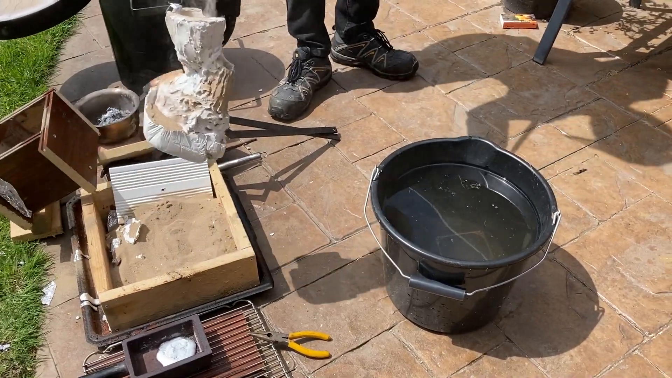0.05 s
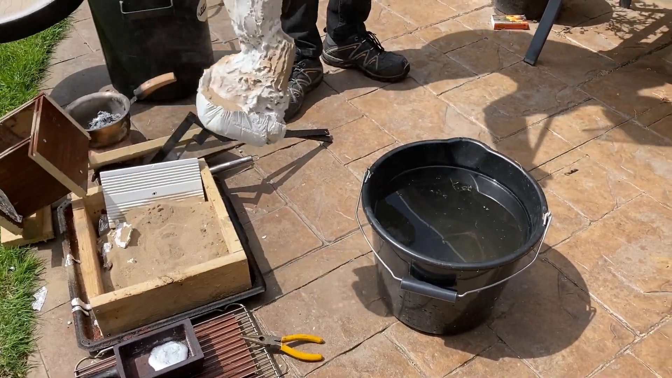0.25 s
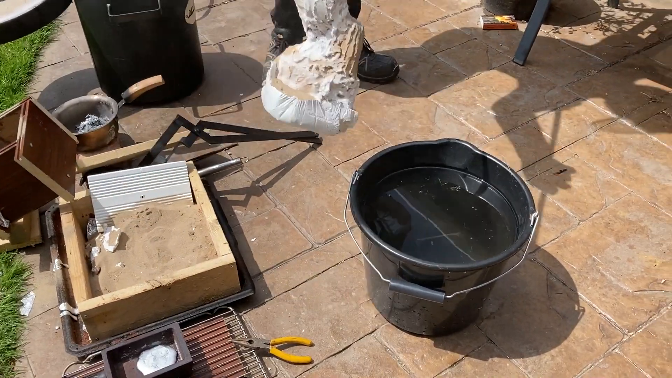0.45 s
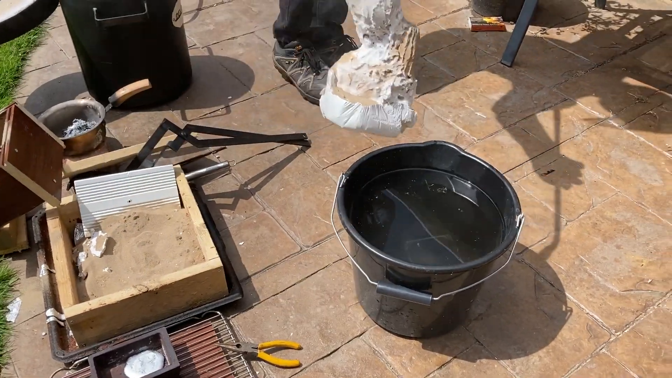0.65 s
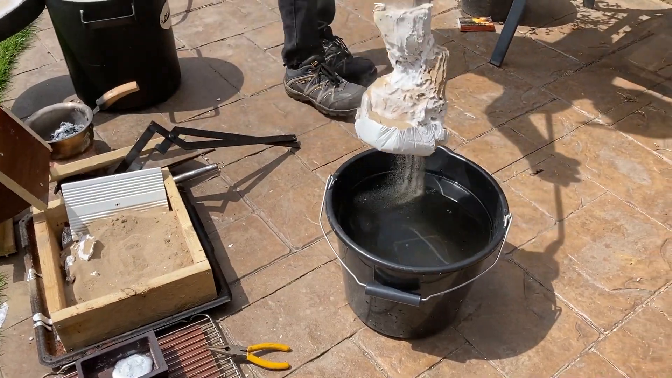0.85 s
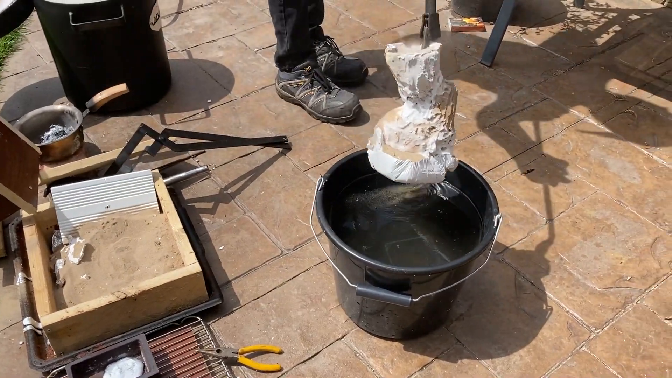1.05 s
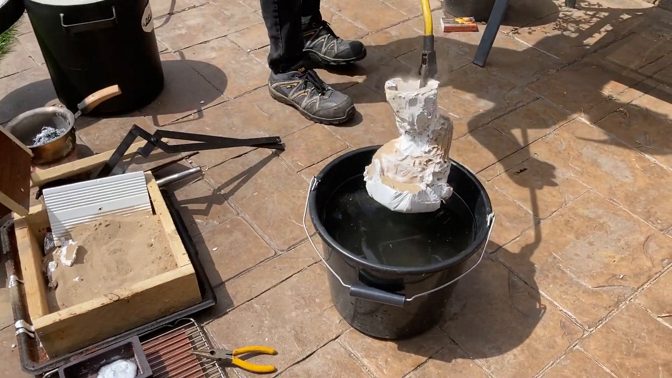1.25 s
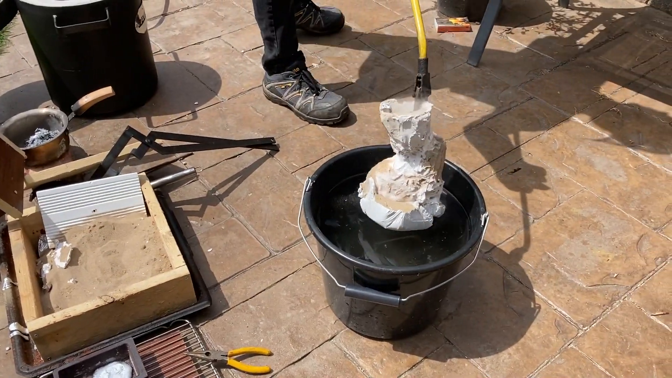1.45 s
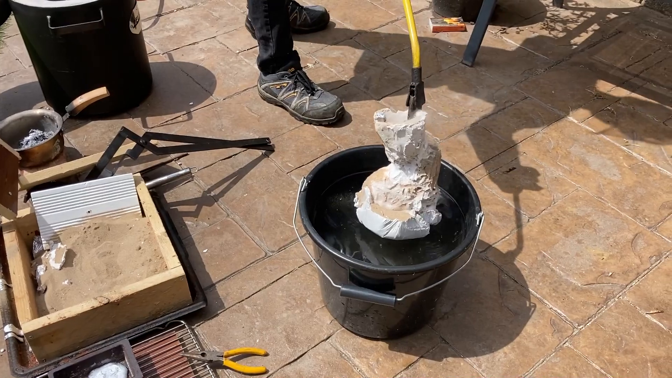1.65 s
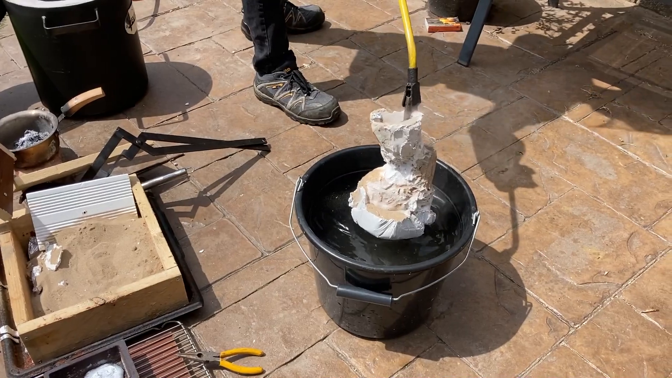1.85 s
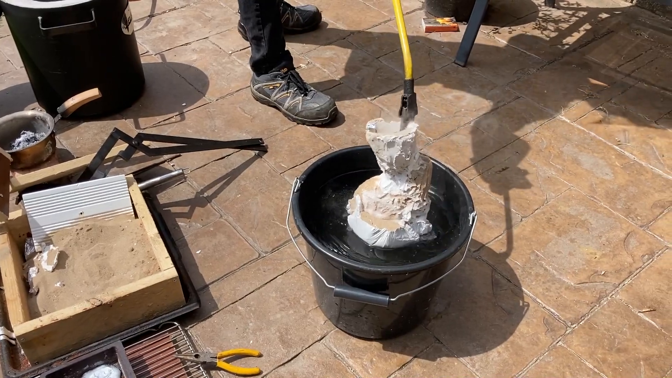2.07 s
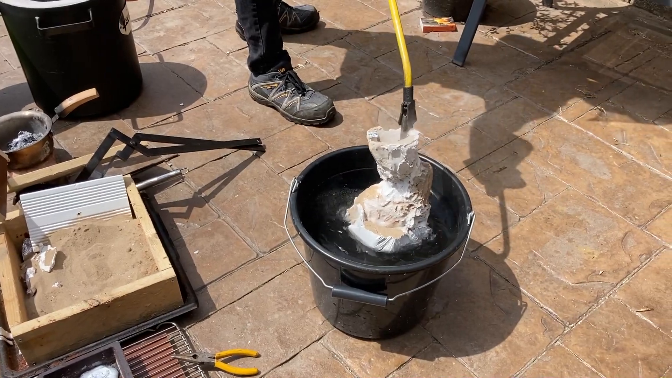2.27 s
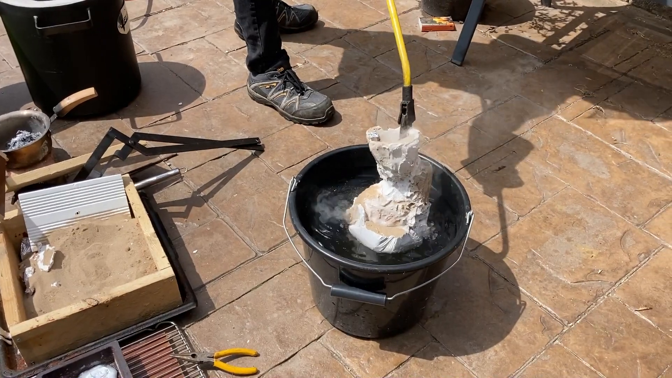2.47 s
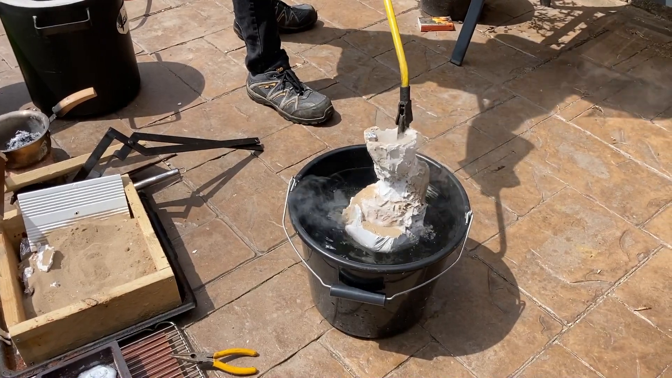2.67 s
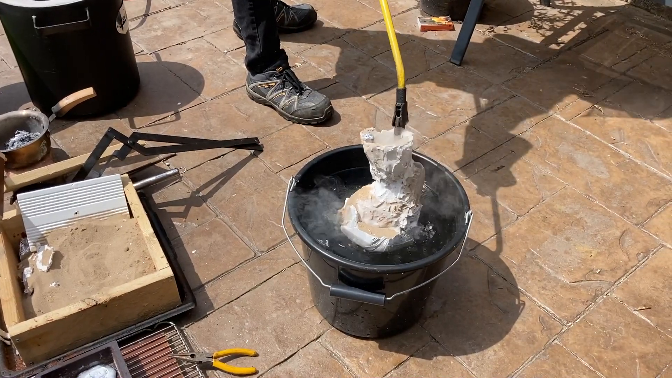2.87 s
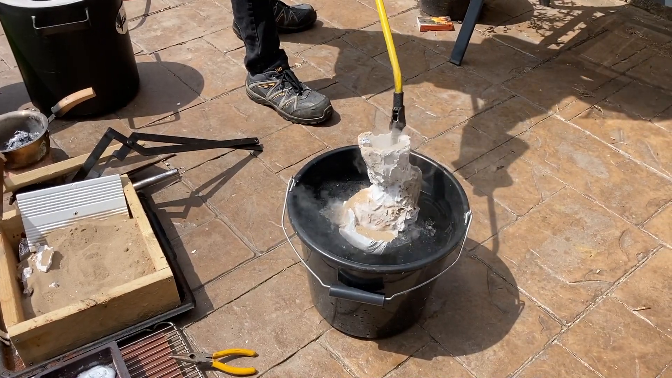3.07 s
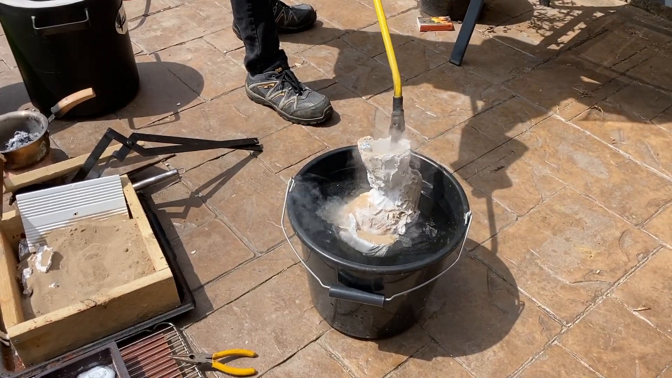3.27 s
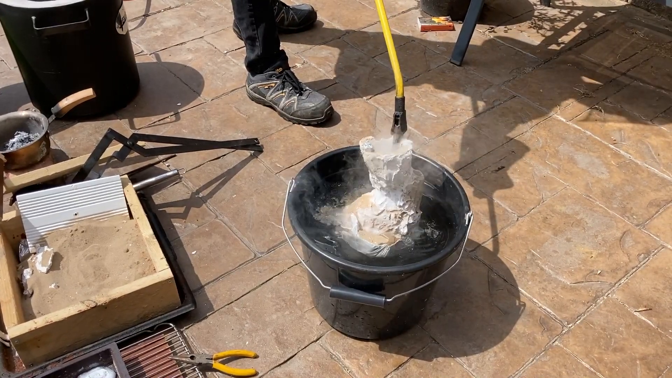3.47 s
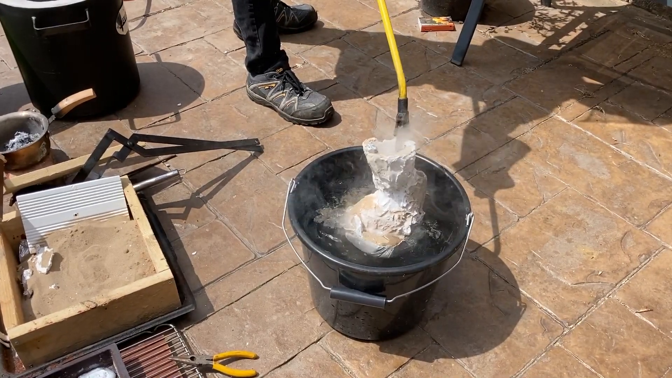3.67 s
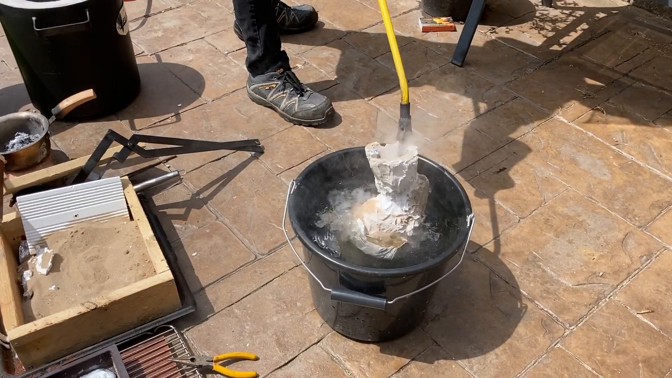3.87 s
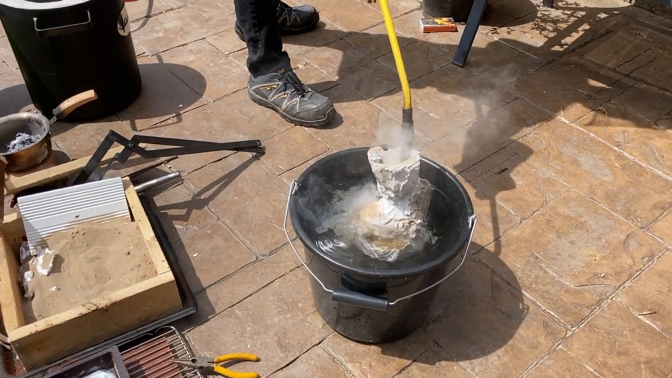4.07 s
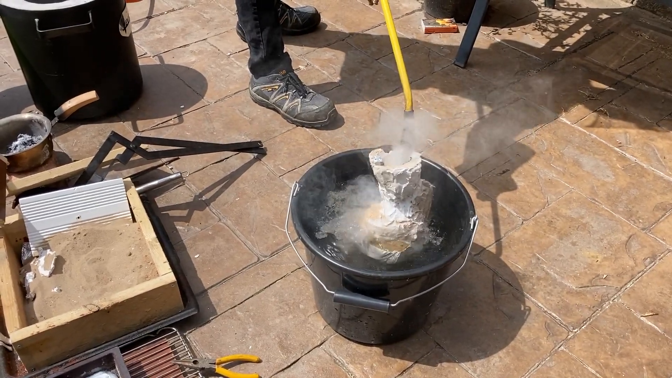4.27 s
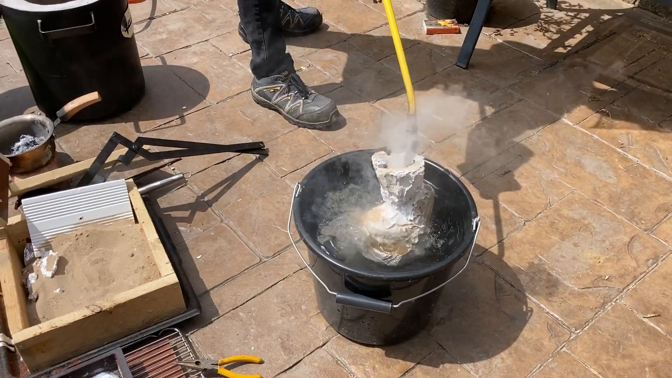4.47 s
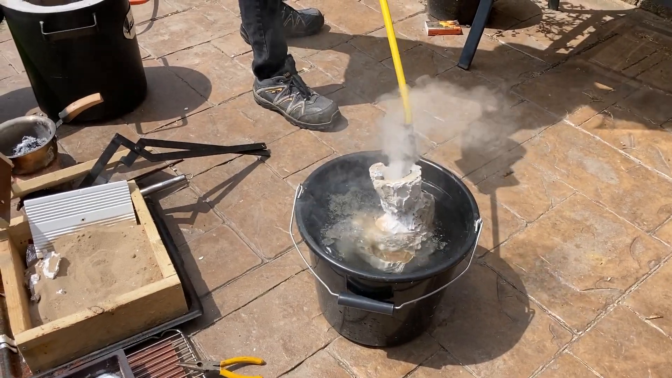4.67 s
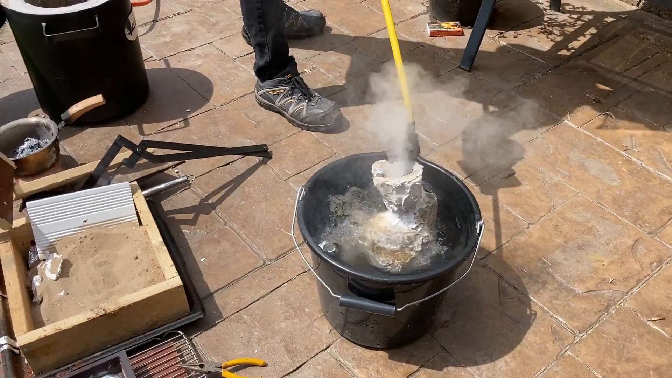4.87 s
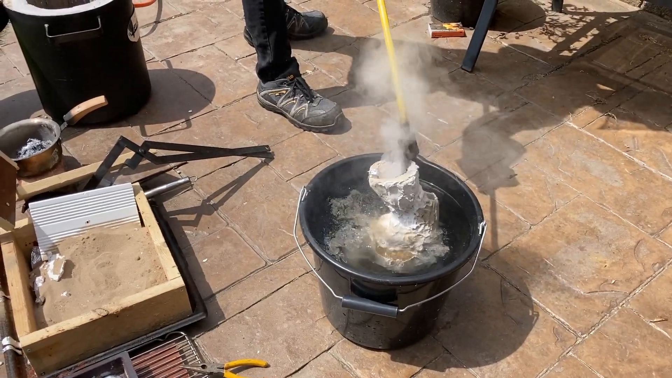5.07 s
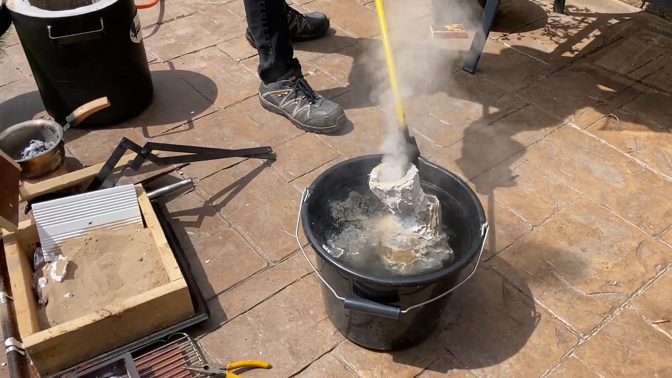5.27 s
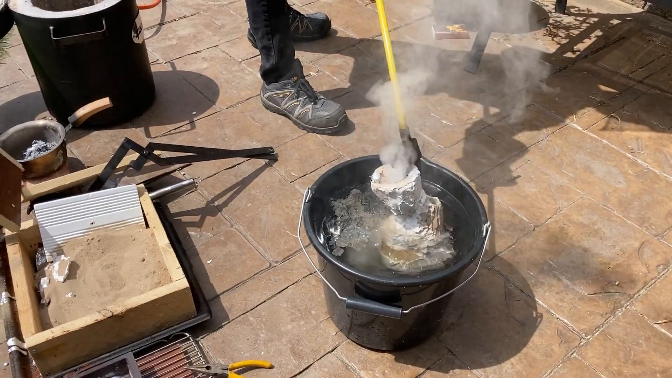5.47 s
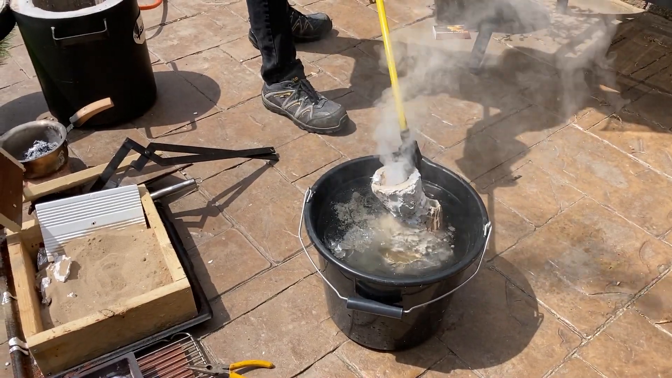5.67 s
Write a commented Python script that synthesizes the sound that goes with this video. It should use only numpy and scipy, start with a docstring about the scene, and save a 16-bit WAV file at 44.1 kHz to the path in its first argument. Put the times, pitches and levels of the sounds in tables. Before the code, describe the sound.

A quiet patio, heard close in stereo, with low far-off traffic and faint wavering engine drone throughout. A shoe scuffs grit briefly at 0.3 s; tiny plaster crumbs patter at about 0.75 and 1.15 s, with faint scuffs around 0.9, 1.2 and 1.4. At 1.45 s the hot mould touches water: a light fizz, small ringing bubbles and little spits. A sharp pop at 2.0 starts the violent boil, and from 2.2 to 2.8 bright hiss and crackle carry a dense cluster of hard, hollow snaps in the plastic bucket. Fresh surges follow near 2.9 and from 3.4, churning and seething, with a lone pop at 3.65. The hiss falls away steeply around 4.3, leaving ticks, soft plops and loose bubbles. From 4.2 to 5.4 a blackbird sings mellow gliding whistles, then higher, rougher chirps, lightly echoed. Low wind bumps hit the microphone near 4.05, 4.7 and 5.5.

```python
"""A patio: a hot plaster casting mould is lowered with tongs into a plastic bucket of water.
A shoe scuffs and plaster crumbs patter: coloured random grit. The water then sizzles, boils in surges
and settles: noise, random clicks and ringing bubbles, with sharp steam pops that ring the bucket's modes.
A blackbird sings one phrase of gliding whistles; traffic noise, drones and gusts on the microphone lie behind."""
import sys
import numpy as np
from scipy import signal
from scipy.fft import rfft, irfft, next_fast_len
from scipy.io import wavfile
from scipy.ndimage import map_coordinates

SR = 44100
rng = np.random.default_rng(int(sys.argv[2]) if len(sys.argv) > 2 else 0)


def wrap_up_sound(samples):
    """Save the sound to the file named by the first command line argument, as 16-bit audio."""
    columns = np.atleast_2d(samples).T
    # keep every value between -1 and 1, then stretch to whole-number steps
    tamed = np.clip(columns, -1, 1)
    steps = np.round(tamed * 32767).astype(np.int16)
    wavfile.write(sys.argv[1], SR, steps)


N = 252252
TIME = np.arange(N) / SR

# spectrum of bubbles bursting on hot plaster: [f/Hz, level/dB]
SIZZLE_SPECTRUM = [(1000, -14), (2500, -1.5), (4000, -1.5), (5700, -2), (7000, 2), (8500, 3.2), (10000, 5),
                   (12000, 2.3), (14000, -1.5), (15500, -3.5)]


def from_db(db):
    """Decibels to amplitude gain."""
    return 10 ** (np.asarray(db) / 20)


def rms_one(x):
    """Scale to unit power."""
    return x / np.sqrt(np.mean(x ** 2) + 1e-20)


def level(rows, fade_s=0.065):
    """Gain interpolated in dB from rows of (t/s, level/dB), fading out beyond both ends."""
    s, db = np.transpose(rows)
    outside_s = np.maximum(s[0] - TIME, TIME - s[-1]).clip(0)
    return from_db(np.interp(TIME, s, db)) * np.exp(-np.minimum(outside_s / fade_s, 20))


def swells(rows, shape=2):
    """Bell gains from rows of (middle/s, half length/s, level/dB), 1/e at the half length; shape < 2 is pointed."""
    return sum(from_db(db) * np.exp(-np.abs((TIME - s) / half_s) ** shape) for s, half_s, db in rows)


def drift(rate_hz):
    """Smooth random wander, rms 1: noise through a double pole, run at SR / 40."""
    step = 40
    settle = 2000
    r = np.exp(-2 * np.pi * rate_hz * step / SR)
    noise = rng.standard_normal(N // step + settle + 2)
    slow = rms_one(signal.lfilter([1], [1, -2 * r, r * r], noise)[settle:])
    return np.interp(np.arange(N) / step, np.arange(len(slow)), slow)


def padded_size():
    """FFT length with room for filter tails."""
    return 2 * next_fast_len(N // 2 + SR // 10)


def colour(x, points):
    """Minimum-phase filter, from the folded cepstrum, following (f/Hz, level/dB) points; output rms 1."""
    size = padded_size()
    hz, db = np.transpose(points)
    log_bins = np.log(np.fft.rfftfreq(size, 1 / SR) + 1)
    log_gain = np.log(from_db(np.interp(log_bins, np.log(hz), db)))
    cepstrum = irfft(log_gain)[:size // 2]
    cepstrum[1:] *= 2
    response = np.exp(rfft(cepstrum, size))
    return rms_one(irfft(rfft(x, size) * response)[..., :N])


def ring(clicks, hz, t60_s):
    """Two-pole resonator: a unit click starts a decaying sine of height 1."""
    r = from_db(-60 / (t60_s * SR))
    w = 2 * np.pi * hz / SR
    return signal.lfilter([0, np.sin(w)], [1, -2 * r * np.cos(w), r * r], clicks + 1e-18)


def grains(per_s, spread_db):
    """Random clicks of uneven size and either sign; a varying rate leaves the power steady; rms 1."""
    sizes = from_db(spread_db * np.minimum(rng.exponential(1, N), 4))
    signed = sizes * rng.choice([-1, 1], N)
    struck = rng.random(N) < per_s / SR
    return rms_one(signed * struck / np.sqrt(per_s))


def bubbles(clicks, low_hz, high_hz, cycles, count):
    """Each click rings one of several bubble pitches, losing 60 dB in a set number of cycles; rms 1."""
    dealt = rng.integers(0, count, N)
    pitches_hz = np.geomspace(low_hz, high_hz, count)
    return rms_one(sum(hz * ring(clicks * (dealt == k), hz, cycles / hz) for k, hz in enumerate(pitches_hz)))


def puffs(kicks, decay_s):
    """Kicks smeared into exponential decays, rms 1."""
    return rms_one(signal.lfilter([1], [1, -np.exp(-1 / (decay_s * SR))], kicks + 1e-18))


def strike(s, peak_db, modes, tilt_db):
    """Blows on (f/Hz, level/dB, t60/s) modes, tilted in dB per octave about 2.5 kHz, each mode varied at random."""
    out = np.zeros(N)
    for k, (hz, mode_db, t60_s) in enumerate(modes):
        clicks = np.zeros(N)
        chance_db = rng.normal(0, 1.5, len(s))
        tilted_db = tilt_db * np.log2(hz / 2500)
        clicks[(s * SR).astype(int)] = from_db(peak_db + mode_db + tilted_db + chance_db)
        out += (-1) ** k * ring(clicks, hz, t60_s)
    return out


def surge(start_s, rise_s, hold_s, fall_s, db, growth_db_per_s):
    """Gain of one surge: it builds up, holds with a steady trend in dB and dies away."""
    t = TIME - start_s
    build = np.sin(np.pi / 2 * np.clip(t / rise_s, 0, 1)) ** 2
    trend_db = growth_db_per_s * np.clip(t - rise_s, 0, hold_s)
    fall_db = 20 * np.maximum(t - rise_s - hold_s, 0) / max(fall_s, 0.09)
    return build * from_db(db + trend_db - fall_db)


def together(gains):
    """Overlapping bouts of boiling add in power; all stall briefly just after the first loud pop."""
    hush_db = swells([(2.03, 0.016, 0)]) * -7
    return np.sqrt(sum(g ** 2 for g in gains) + 1e-18) * from_db(hush_db)


def boil_levels():
    """Gains over time of the sizzle, its top octave, the crackle and the churning."""
    # surges from first touch to last simmer, levels before the mix: [start/s, rise/s, hold/s,
    # 20 dB fall/s (at least 0.09), sizzle/dB, sizzle growth/(dB/s), crackle/dB, churn/dB, top re sizzle/dB]
    surge_rows = [(1.453, 0.12, 0.14, 0.3, -46, -47, -52.5, -61.5, -1),
                  (1.723, 0.17, 0.14, -1, -46.5, 42, -57, -73.5, -27),
                  (1.984, 0.18, 0.27, 2.5, -40.5, 31.5, -46, -61.5, -28),
                  (2.195, 0.18, 0.4, 0.42, -31, -17.5, -36.5, -45, -0.5),
                  (2.841, 0.16, 0.24, 0.26, -33.5, -0.5, -45.5, -43.5, 2.5),
                  (3.406, 0.43, 0.43, -0.16, -29, -3.5, -44, -43, 1),
                  (4.301, 0.11, 0.43, 10.5, -53, -55, -71, -61, 2)]
    # brief spits of steam off the plaster, before the mix: [middle/s, half length/s, level/dB]
    spit_rows = [(1.665, 0.021, -39), (1.785, 0.0063, -40), (2.255, 0.011, -32.5), (2.36, 0.042, -33.5),
                 (3.165, 0.059, -30.5), (3.33, 0.051, -36.5), (4.05, 0.096, -29), (4.405, 0.018, -45.5),
                 (4.62, 0.021, -47), (4.87, 0.045, -49), (4.98, 0.036, -55), (5.13, 0.02, -55),
                 (5.425, 0.043, -44.5)]
    # water slopping in the bucket, before the mix: [middle/s, half length/s, level/dB]
    slop_rows = [(2.99, 0.011, -48), (5.575, 0.0323, -60)]
    # large bubbles thin out while a surge holds
    crackle_sag_db_per_s, churn_sag_db_per_s = 6, 8
    sizzle, top = [swells(spit_rows)], [swells(spit_rows)]
    crackle = [swells([(5.02, 0.26, -59)])]  # last soft swell as the mould cools
    churn = [swells(slop_rows)]
    for *timing, sizzle_db, growth, crackle_db, churn_db, top_db in surge_rows:
        sizzle.append(surge(*timing, sizzle_db, growth))
        top.append(sizzle[-1] * from_db(top_db))
        crackle.append(surge(*timing, crackle_db, -crackle_sag_db_per_s))
        churn.append(surge(*timing, churn_db, -churn_sag_db_per_s))
    return [together(gains) for gains in (sizzle, top, crackle, churn)]


def spurts(per_s=320, decay_s=0.0012, share=0.12):
    """Steam escapes unevenly: a gain of random short spurts and a slower wander, rms 1."""
    # unevenness of the escaping steam: [t/s, swing/dB]
    sputter_rows = [(1.9, 1.4), (2.4, 2), (3.0, 1.8), (3.7, 1), (4.3, 1), (4.6, 1.6)]
    kicks = (rng.random(N) < per_s / SR) * rng.uniform(.3, 1, N)
    clumps = puffs(kicks, decay_s)
    swing_db = np.interp(TIME, *np.transpose(sputter_rows))
    clump_share = np.clip(share * swing_db / 2, 0, 1)
    wander = from_db(swing_db * np.clip(drift(23.3), -2, 2))
    return rms_one(np.sqrt(1 - clump_share + clump_share * clumps ** 2) * wander)


def sinking(x):
    """The air gap around the mould changes shape as it sinks: variable-speed reading slides the resonances."""
    # pitch of the air gap between mould and bucket: [t/s, ratio]
    gap_rows = [(1.5, 1.06), (2.3, 1), (3.05, 1), (3.7, .9), (4.3, .88)]
    speed = np.interp(TIME, *np.transpose(gap_rows))
    return map_coordinates(x, [np.cumsum(speed)], order=3, mode="mirror")


def chugging(per_s=36, decay_s=0.0071):
    """Steam pockets swell and cave in at a loose beat; a gain of rms 1."""
    beats = np.cumsum(per_s * from_db(3 * drift(30))) / SR
    kicks = np.diff(np.floor(beats), prepend=0) * rng.uniform(.4, 1, N)
    return np.sqrt((1 + puffs(kicks, decay_s) ** 2) / 2)


def boiling(vigour, churning):
    """Collapsing steam bubbles crackle in the bucket, more of them as the boil rises; big ones chug below."""
    # crackle spectrum: [f/Hz, level/dB]
    crackle_spectrum = [(300, -15), (700, -6), (1100, -9), (1350, -2.5), (1620, -2), (1850, -10),
                        (2270, 3.5), (2550, -5), (2870, 4), (3150, 2), (3550, -4), (3900, 1.5), (4400, 0),
                        (5500, -7), (9000, -5), (16000, -40)]
    # churn spectrum: [f/Hz, level/dB]
    churn_spectrum = [(150, -14.5), (300, -14.5), (450, -4.5), (620, -3), (790, 5), (900, 2.5),
                      (1050, -10.5), (1500, -1), (2500, -16)]
    collapses = grains(per_s=2500 + 6000 * vigour / vigour.max(), spread_db=1.5)
    ringing = bubbles(grains(per_s=4000, spread_db=2), low_hz=1834, high_hz=5560, cycles=90, count=36)
    crackle = sinking(colour(collapses + from_db(-7) * ringing, crackle_spectrum))
    gurgle = bubbles(grains(per_s=700, spread_db=2.5), low_hz=334, high_hz=890, cycles=6.7, count=14)
    churn = colour(chugging() * collapses + from_db(-15.5) * gurgle, churn_spectrum)
    return vigour * crackle + churning * churn


def sizzling(heat, top):
    """Tiny bubbles burst and ping over a smooth jet of steam noise; the top has its own gain."""
    bursts = grains(per_s=2200 + 14000 * heat / heat.max(), spread_db=1.0)
    pings = bubbles(grains(per_s=680, spread_db=4.5), low_hz=5615, high_hz=15040, cycles=140, count=44)
    jet = rng.standard_normal(N)
    hiss = colour(bursts + from_db(-10) * pings + from_db(-6) * jet, SIZZLE_SPECTRUM)
    fine = signal.sosfilt(signal.butter(1, 11000, "high", fs=SR, output="sos"), hiss)
    return from_db(-5) * heat * (hiss - fine) + from_db(-2) * top * fine


def pops():
    """A large steam collapse cracks, rebounds and rings the bucket; lower tilts sound duller."""
    # single steam pops, before the mix: [t/s, nominal peak/dB, tilt/(dB/octave)]
    pop_rows = [(1.3826, -37.5, -1.5), (1.651, -25.5, 5.5), (1.668, -26, 7), (1.7853, -34, 7),
                (2.0083, -11, 3), (2.0519, -23.5, 3), (2.145, -24, 5.5), (2.233, -25, 3.5),
                (2.27, -13, 1.5), (2.2941, -27.5, -8), (2.3508, -11, -5), (2.4435, -14.5, -3.5),
                (2.4575, -19, 0), (2.4675, -16.5, -1.5), (2.4924, -6, 1.5), (2.5261, -5.5, 2.5),
                (2.548, -14.5, 5), (2.6066, -11, 3.5), (2.7035, -22, 3), (2.71, -18, -2),
                (2.7854, -8.5, 1.5), (2.7972, -7, 0.5), (2.92, -24, -2), (2.993, -15, -3.5),
                (3.092, -16, 4), (3.6516, -14, 0.5), (4.371, -44.5, 6), (4.8158, -43.5, 9), (4.844, -43, 9),
                (5.16, -42, 11.5)]
    # bucket modes: [f/Hz, level/dB, t60/s]
    bucket_modes = [(530, -8, .016), (780, -7, .016), (1450, -11, .01), (2350, -7, .008), (3155, -4, .006),
                    (3900, -3, .005), (4500, 0, .003), (6500, 4.5, .0015), (9100, 4.5, .0008),
                    (12000, -2, .001)]
    snap_db, snap_t60_s = -13, 0.0089  # noise rattling between the bucket's walls
    s, peak_db, tilt_db = np.transpose(pop_rows)
    first = strike(s, peak_db - 14, bucket_modes, tilt_db)
    rebound_s = s + rng.uniform(0.00047, 0.00119, len(s))
    rebound = strike(rebound_s, peak_db - 20, bucket_modes, tilt_db - 0.5)
    rattle = np.zeros(N)
    for at_s, db in zip(s, peak_db):
        decay_db = 60 * np.clip((TIME - at_s) / snap_t60_s, 0, 3)
        rattle += from_db(db + snap_db - decay_db) * (TIME >= at_s)
    band = signal.butter(1, [400, 7500], "band", fs=SR, output="sos")
    snap = signal.sosfilt(band, rattle * rng.uniform(-1.1, 1, N))
    return first + rebound + snap


def plops():
    """The water first meets the hot mould with a short hollow knock; later, large slow bubbles open at the
    surface with the same knock."""
    # the water's first touch on the mould (1.443 s), then surface bubbles, before the mix: [t/s, nominal
    # peak/dB, tilt/(dB/octave)]
    plop_rows = [(1.443, -49.5, -3), (4.887, -42, 0.5), (5.014, -39, -2), (5.555, -48, -2.5),
                 (5.594, -45, -2), (5.694, -46, -1.5)]
    # bubble modes: [f/Hz, level/dB, t60/s]
    plop_modes = [(248, -15, .025), (442, -3, .025), (640, 3.5, .009), (950, 0, .006), (1400, 3, .0046),
                  (2100, 1, .004)]
    s, peak_db, tilt_db = np.transpose(plop_rows)
    return strike(s, peak_db, plop_modes, tilt_db)


def wash():
    """Water washes up the plaster and drives out small ringing air bubbles."""
    # washes as the mould goes in, before the mix: [middle/s, half length/s, level/dB]
    wash_rows = [(1.56, 0.073, -59), (1.68, 0.21, -59)]
    air = bubbles(grains(per_s=2400, spread_db=4), low_hz=1220, high_hz=2650, cycles=24, count=22)
    return swells(wash_rows) * air


def ticking():
    """Lone bubbles snap on the wet plaster: sparse coloured clicks."""
    # snapping bubbles, before the mix: [t/s, level/dB]
    tick_rows = [(1.55, -60), (2.2, -56), (4.4, -63), (4.7, -71), (5.0, -70), (5.3, -87), (5.7, -68)]
    return level(tick_rows) * colour(grains(per_s=200, spread_db=3.5), SIZZLE_SPECTRUM)


def simmer():
    """Loose air bubbles rise and ring as the boil dies away."""
    # loose bubbling, before the mix: [t/s, level/dB]
    simmer_rows = [(4.35, -68.5), (4.9, -63), (5.3, -72.5), (5.58, -61.5), (5.7, -61)]
    loose = bubbles(grains(per_s=110, spread_db=3), low_hz=282.7, high_hz=1550, cycles=18, count=20)
    return level(simmer_rows) * loose


def crumbs():
    """Plaster grit lands in short, uneven showers that swell and fade: clicks with a wandering level."""
    # showers, before the mix: [start/s, length/s, starting level/dB]
    shower_rows = [(.72, 0.15, -74.5), (1.125, 0.14, -69)]
    # crumb spectrum: [f/Hz, level/dB]
    crumb_spectrum = [(1500, 4.5), (3000, -7), (4500, -1.5), (5700, 9.5), (7500, -9), (9300, 4),
                      (11000, -10), (13000, -17), (16000, -29.5)]
    shower = 0
    for s, length_s, db in shower_rows:
        arc = [(s, db), (s + 0.52 * length_s, db + 4), (s + length_s, db - 11.5)]
        shower = shower + level(arc, fade_s=0.0046)
    grit = grains(per_s=1500, spread_db=4) * from_db(2.5 * drift(60))
    return shower * colour(grit, crumb_spectrum)


def scatter(x, t60_s, delay_s):
    """Diffuse reflections: a decaying noise tail of unit energy, different at each ear."""
    t = np.arange(int(SR * (t60_s + delay_s))) / SR
    tail = rng.standard_normal((2, len(t))) * from_db(-60 * t / t60_s) * (t > delay_s)
    tail /= np.sqrt(np.sum(tail ** 2, axis=1, keepdims=True))
    return signal.fftconvolve(x[None], tail, axes=1)[:, :N]


def ports(x):
    """Two microphone ports hear the bucket with a phase difference that depends on pitch."""
    # lead of the left port over the right: [f/Hz, phase/rad]
    lead_rows = [(0, 0), (900, .15), (1700, .6), (2100, 1.9), (2750, 3.1), (3750, 6.2), (4250, 6.4),
                 (5350, 9.4), (5800, 9.8), (6300, 12.5), (7250, 12.5), (9180, 9.42), (11100, 6.3),
                 (11600, 6.2), (13500, 3.14), (15300, 0), (22050, 0)]
    size = padded_size()
    lead_rad = np.interp(np.fft.rfftfreq(size, 1 / SR), *np.transpose(lead_rows))
    shift = np.exp(.5j * lead_rad * np.array([[1], [-1]]))
    return irfft(rfft(x, size) * shift)[:, :N]


def bucket():
    """Everything at the bucket, heard direct and scattered by its walls, whose pattern turns as the mould sinks."""
    sputter = spurts()
    heat, top, vigour, churning = boil_levels()
    boil = sputter * boiling(vigour, churning) + wash() + simmer()
    fizz = sputter * sizzling(heat, top) + ticking() + crumbs()
    cracks = pops() + plops()
    band = signal.butter(2, [1050, 5500], "band", fs=SR, output="sos")
    inside = signal.sosfilt(band, boil + .5 * fizz + from_db(-7) * cracks)
    sink_from_s, sink_s = 2.0, 1.8
    turn = np.pi / 2 * np.clip((TIME - sink_from_s) / sink_s, 0, 1)
    # equal-power crossfade between two reflection patterns
    walls = sum(weight * scatter(inside, t60_s=.04, delay_s=.0006) for weight in (np.cos(turn), np.sin(turn)))
    fizz_echo = from_db(-9) * scatter(fizz, t60_s=.08, delay_s=.001)
    return ports(boil + fizz + cracks) + from_db(-2) * walls + fizz_echo


def scuffs(catch_db=2.0):
    """A sole drags over gritty paving, catching and slipping: dense clicks with a wandering level."""
    # shoe movements: [middle/s, half length/s, level/dB]
    scuff_rows = [(.3, .055, -70), (.335, .02, -55.5), (.368, 0.025, -57.5), (.92, 0.059, -67),
                  (1.2, 0.047, -69), (1.39, .0187, -67)]
    # scuff spectrum: [f/Hz, level/dB]
    scuff_spectrum = [(300, -4), (800, 0), (1400, -2), (2100, 1), (2600, -5), (3050, 2), (3900, -9),
                      (5000, -11), (7500, -9.5), (12000, -22), (15000, -29)]
    grit = np.array([grains(per_s=7000, spread_db=2) for ear in range(2)])
    return swells(scuff_rows, shape=1.5) * colour(grit * from_db(catch_db * drift(77)), scuff_spectrum)


def blackbird(warble_hz=130):
    """Nearly pure whistles from the two sides of the syrinx, each one arc of pitch; warbled ones are rough."""
    # strokes, before the mix: [start/s, length/s, first f/Hz, middle f/Hz, last f/Hz, level/dB,
    # warble depth/1, overtones re fundamental/dB]
    note_rows = [(4.176, 0.25, 1370, 1538, 1340, -43.5, 0.01, -28),
                 (4.43, 0.073, 1690, 2146, 2340, -40.5, 0.13, -25.5),
                 (4.492, 0.025, 1990, 2010, 2020, -33, 0.01, -40),
                 (4.515, 0.064, 1937, 1952, 1934, -34.5, 0.01, -40),
                 (4.574, 0.04, 1928, 1926, 1880, -38.5, 0.02, -40),
                 (4.522, 0.084, 2673, 2710, 2750, -59, 0.004, -40),
                 (4.699, 0.02, 1710, 1920, 1980, -47.5, 0.05, -40),
                 (4.715, 0.077, 1972, 2024, 1984, -31.5, 0, -47),
                 (4.704, 0.07, 2370, 2774, 2500, -56, 0.04, -40),
                 (4.781, 0.05, 2690, 2490, 2470, -35.5, 0.01, -38),
                 (4.787, 0.06, 2015, 2015, 1990, -47.5, 0.04, -40),
                 (4.908, 0.022, 2870, 3290, 3520, -47, 0.03, -20),
                 (4.921, 0.088, 3480, 3590, 3390, -42.5, 0.03, -12),
                 (4.972, 0.036, 3470, 2640, 2450, -42.5, 0.07, -12),
                 (4.973, 0.014, 5400, 4600, 4000, -46.5, 0, -22),
                 (4.988, 0.038, 3900, 4200, 3800, -45.5, 0.07, -20),
                 (5.069, 0.029, 2740, 3370, 3620, -52, 0.02, -35),
                 (5.085, 0.073, 3720, 3830, 3650, -46, 0.02, -9),
                 (5.129, 0.016, 5340, 4440, 3980, -41, 0, -39),
                 (5.124, 0.044, 6800, 4530, 4120, -45, 0.06, -38),
                 (5.192, 0.026, 2150, 2204, 2200, -41.5, 0.01, -28),
                 (5.206, 0.0073, 2320, 3000, 3380, -40, 0.05, -23),
                 (5.215, 0.0095, 2220, 2480, 2650, -45, 0.2, -36.5),
                 (5.25, 0.027, 2070, 2180, 2200, -44.5, 0, -13),
                 (5.26, 0.019, 2320, 2706, 3580, -39.5, 0, -34),
                 (5.275, 0.0131, 2930, 2580, 2320, -41.5, 0.1, -23),
                 (5.355, 0.054, 2705, 2450, 2330, -46.5, .11, -19)]
    ramp_share, ramp_max_s = 0.19, 0.01  # attack and release
    swell_db = 1  # rise over a note
    out = np.zeros(N)
    warble_phase = 2 * np.pi * np.cumsum(warble_hz * (1 + .3 * drift(40))) / SR
    warble = .7 * np.sin(warble_phase) + .8 * drift(500)
    waver = .003 * drift(120)
    flicker = from_db(drift(68))
    rasp = drift(214)
    for start_s, length_s, *pitches_hz, db, depth, overtone_db in note_rows:
        near = (TIME > start_s) & (TIME < start_s + length_s)
        u = (TIME[near] - start_s) / length_s
        arc = np.polyfit([0, .5, 1], np.log(pitches_hz), 2)
        hz = np.exp(np.polyval(arc, u)) * (1 + depth * warble[near] + waver[near])
        phase = 2 * np.pi * np.cumsum(hz) / SR
        overtones = from_db(overtone_db) * (np.sin(2 * phase) + from_db(-5) * np.sin(3 * phase))
        strain = np.clip(depth / 0.029, 0, 1)
        tone = (np.sin(phase) + overtones) * (1 + 0.41 * strain * rasp[near])
        ramps = np.clip(np.minimum(u, 1 - u) / min(ramp_share, ramp_max_s / length_s), 0, 1)
        out[near] += np.sqrt(2) * from_db(db - swell_db * (1 - u)) * ramps * tone
    return out * flicker


def garden_bird():
    """The song, nearly equal but opposite in sign at the ears' level trim, with diffuse echoes off the house."""
    song = blackbird()
    direct = from_db(-7.5) * song * from_db([[.6], [-.6]])
    return direct + from_db(-15) * scatter(song, t60_s=.22, delay_s=.008)


def outdoor_noise(points, apart_db):
    """Coloured noise partly shared by both ears; apart_db is each ear's own part."""
    shared = rng.standard_normal(N)
    return colour(shared + from_db(apart_db) * rng.standard_normal((2, N)), points)


def traffic():
    """Far traffic: steady coloured noise and engine drones wavering in pitch and level."""
    # traffic spectrum: [f/Hz, level/dB]
    traffic_spectrum = [(25, -22), (45, -5.5), (80, -1.5), (120, -6.5), (200, -10), (350, -18), (700, -20),
                        (1100, -25), (1600, -33.5), (2800, -45.5), (6000, -53.5), (12000, -54.5),
                        (15000, -65)]
    # engine drones that swell and fade, before wander and ear trim: [f/Hz, level/dB, loudest/s, half length/s]
    drone_rows = [(100.1, -59.5, 2.1, 9), (131.4, -56, 2.62, 2.53)]
    hum = from_db(-54.5) * outdoor_noise(traffic_spectrum, apart_db=-1.5)
    for hz, db, s, half_s in drone_rows:
        phase = 2 * np.pi * np.cumsum(hz * (1 + 0.0195 * drift(6.07))) / SR
        gain = swells([(s, half_s, db)]) * from_db(4 * drift(6))
        hum = hum + np.sqrt(2) * gain * np.sin(phase)
    return hum * from_db([[-.8], [.8]])


def gusts():
    """Gusts bump the microphone: short bells of low noise."""
    # gusts: [middle/s, half length/s, level/dB]
    gust_rows = [(4.05, 0.016, -44), (4.692, 0.013, -35.5), (5.13, 0.045, -64), (5.42, 0.019, -50),
                 (5.51, 0.03, -41.5), (5.578, 0.05, -39.5)]
    # gust spectrum: [f/Hz, level/dB]
    gust_spectrum = [(20, -13), (45, 7.5), (72, 14), (110, 2), (200, -25), (500, -69)]
    return swells(gust_rows) * outdoor_noise(gust_spectrum, apart_db=-9)


def scene():
    """The bucket close by, the bird in the garden, the shoe, traffic and wind."""
    return bucket() + garden_bird() + scuffs() + traffic() + gusts()


def record(dry):
    """A steep elliptic low-pass cuts the top."""
    return signal.sosfilt(signal.ellip(12, .1, 80, 15850, fs=SR, output="sos"), dry)


dry = scene()
out = record(dry)
wrap_up_sound(out)
```